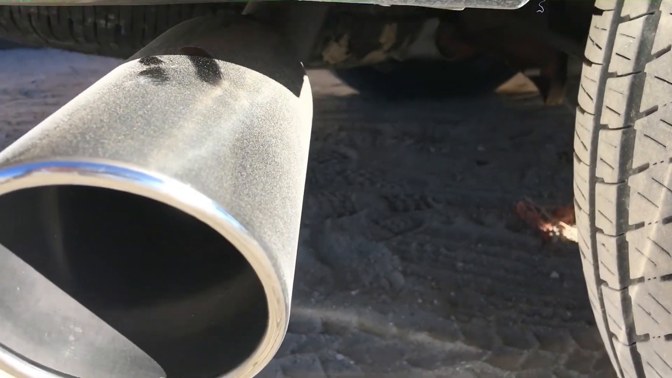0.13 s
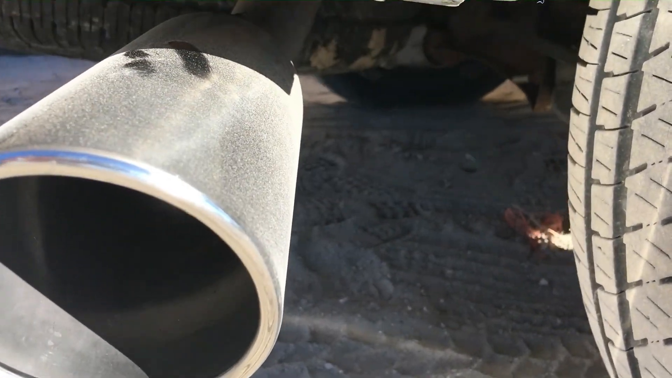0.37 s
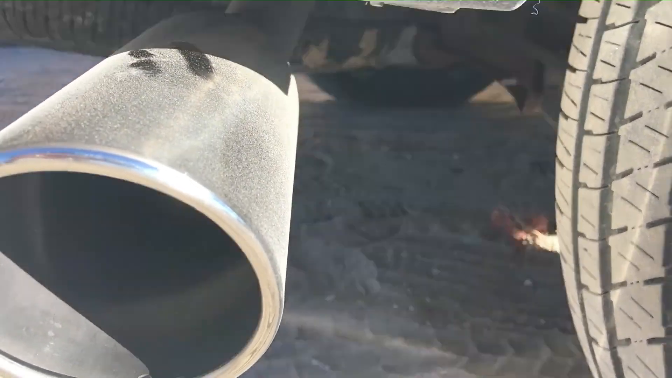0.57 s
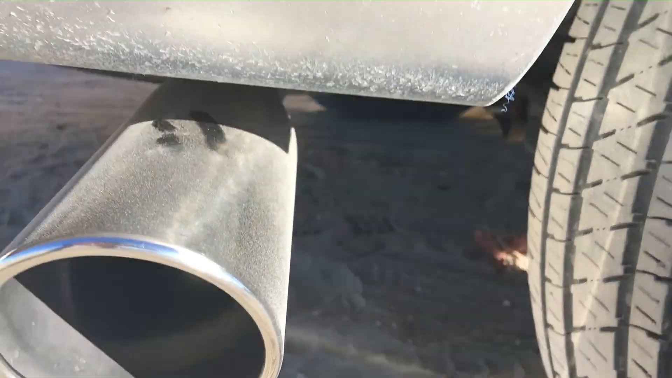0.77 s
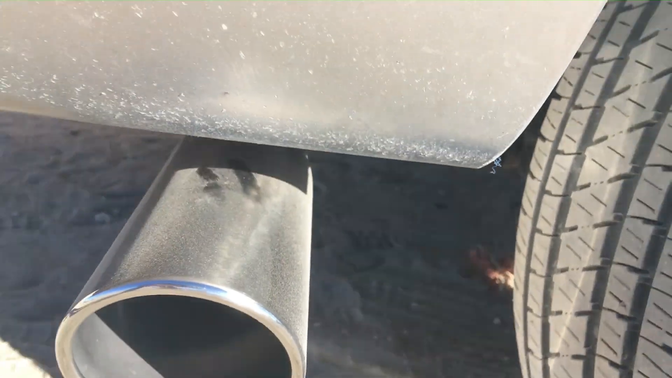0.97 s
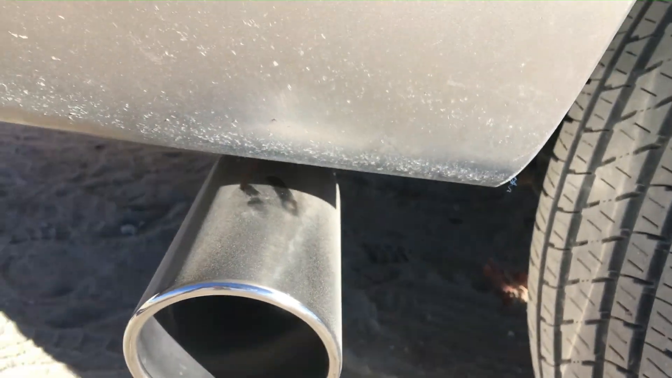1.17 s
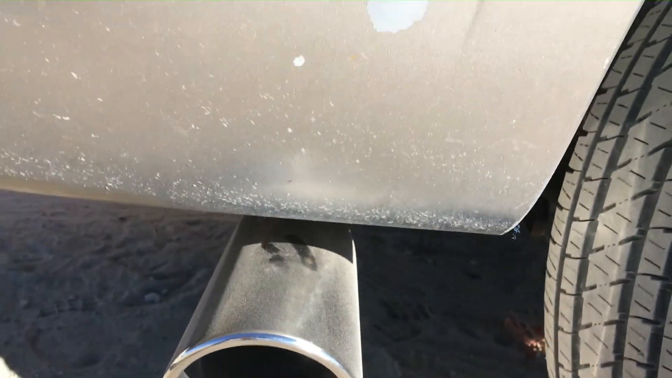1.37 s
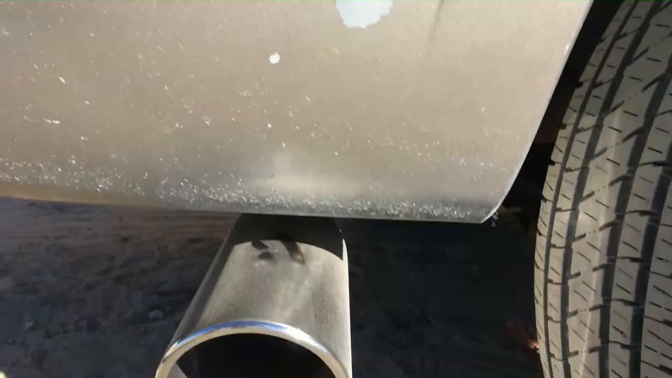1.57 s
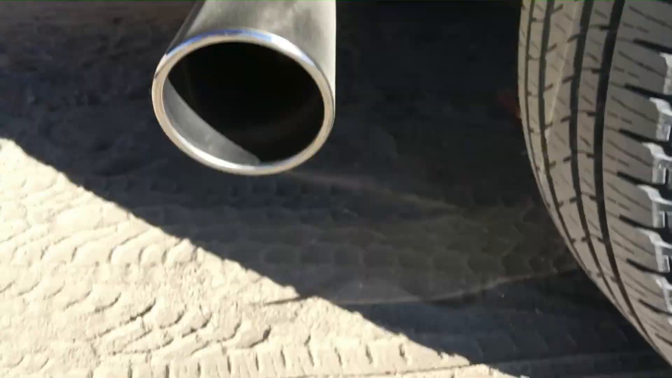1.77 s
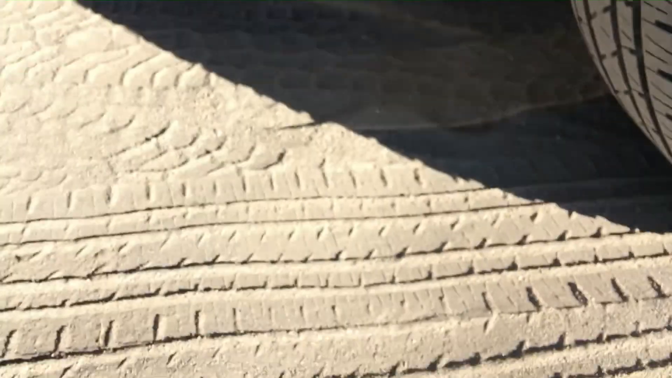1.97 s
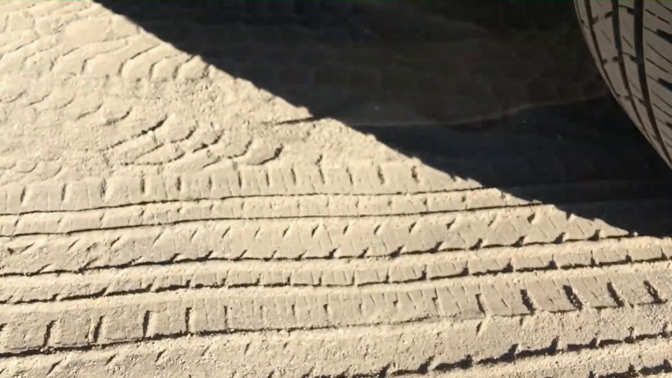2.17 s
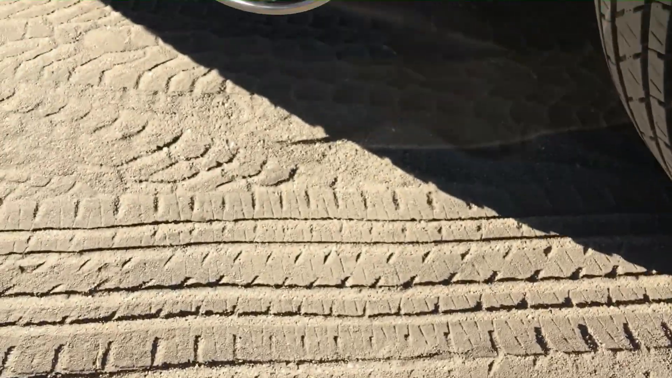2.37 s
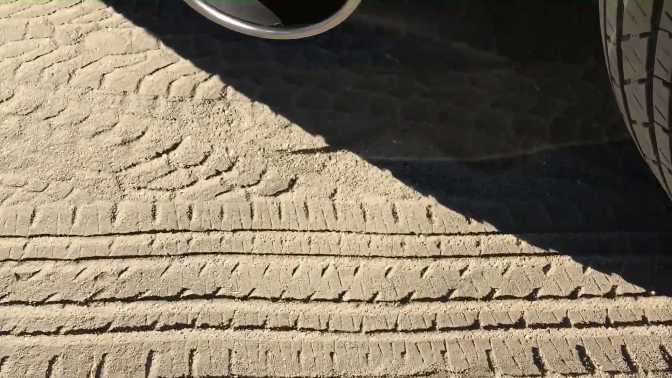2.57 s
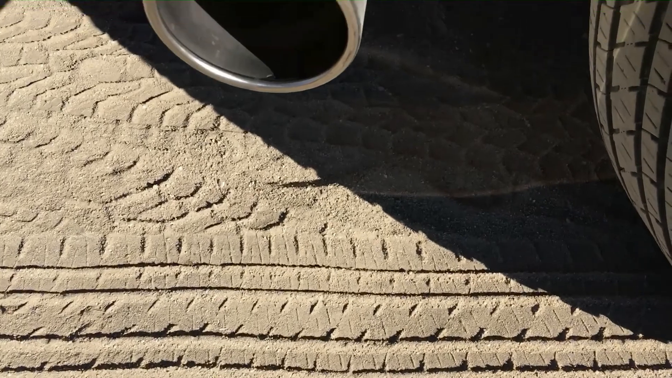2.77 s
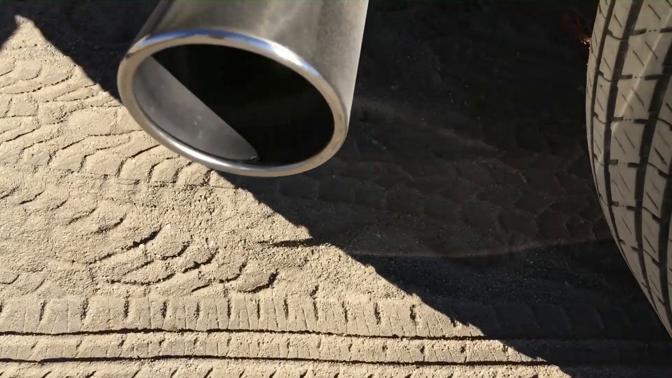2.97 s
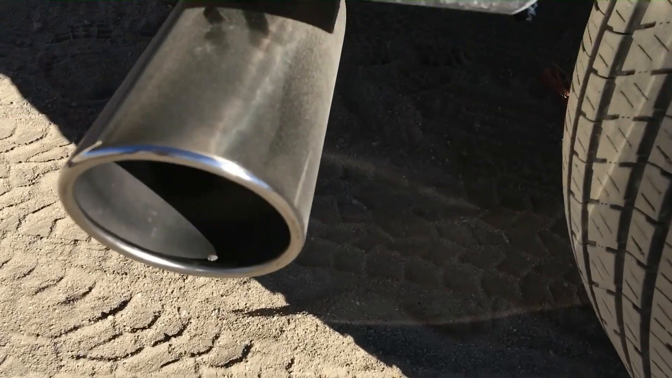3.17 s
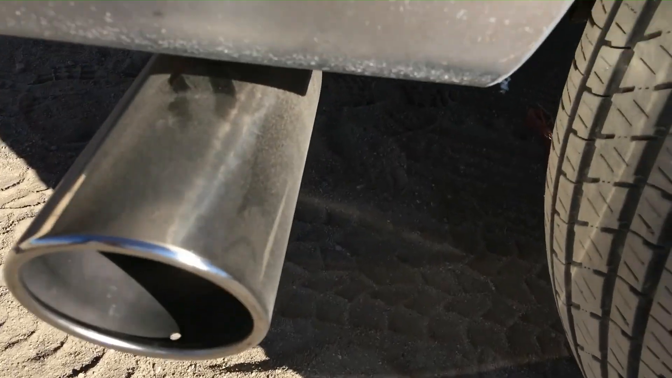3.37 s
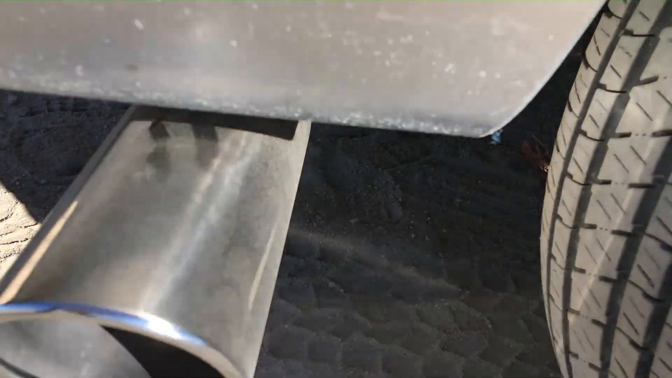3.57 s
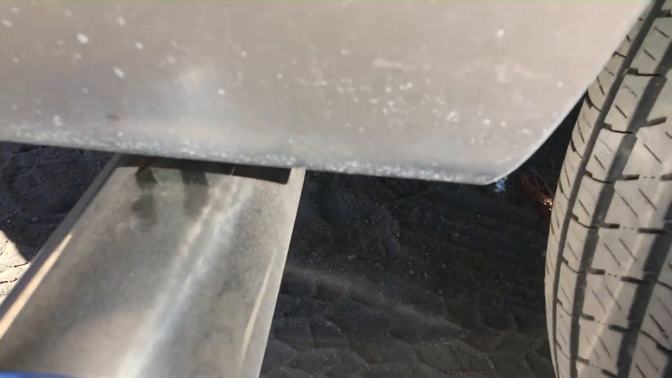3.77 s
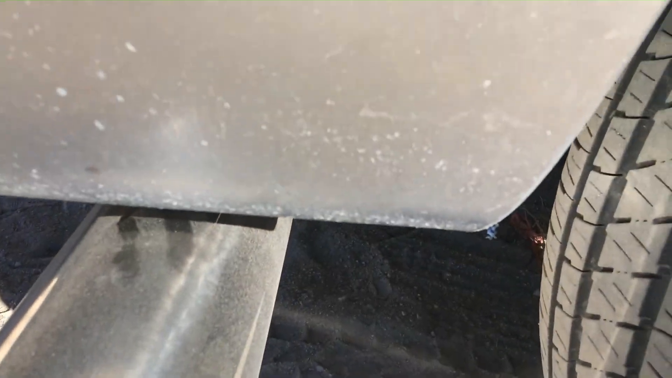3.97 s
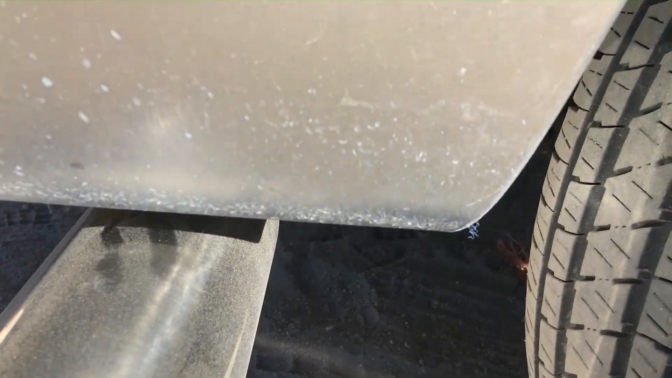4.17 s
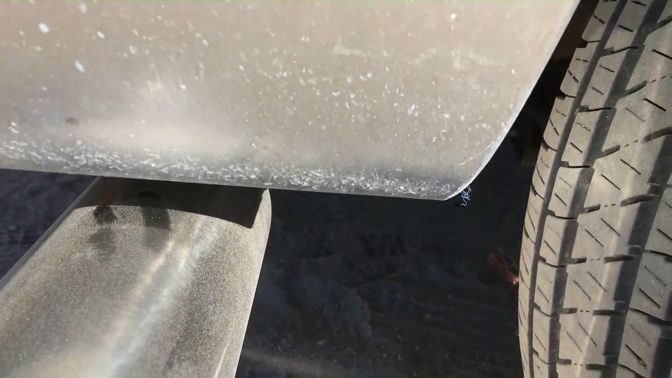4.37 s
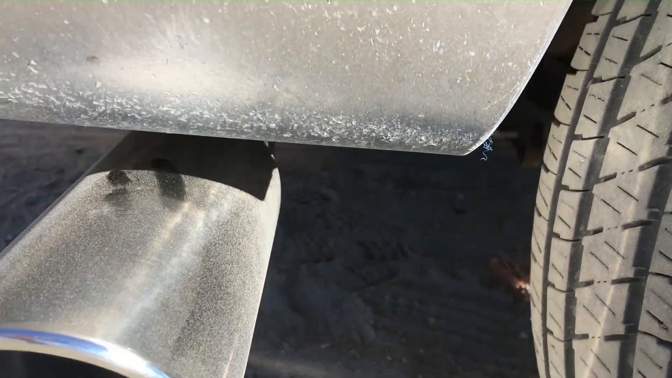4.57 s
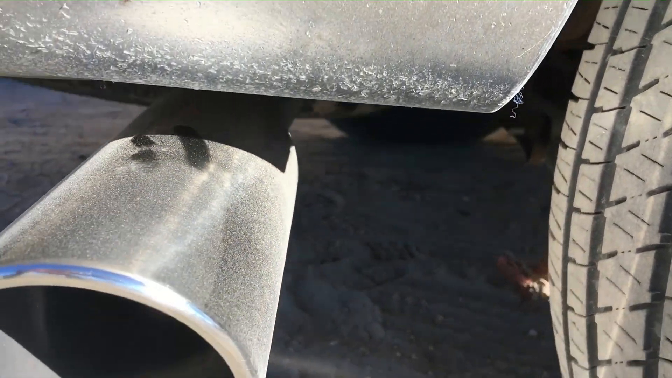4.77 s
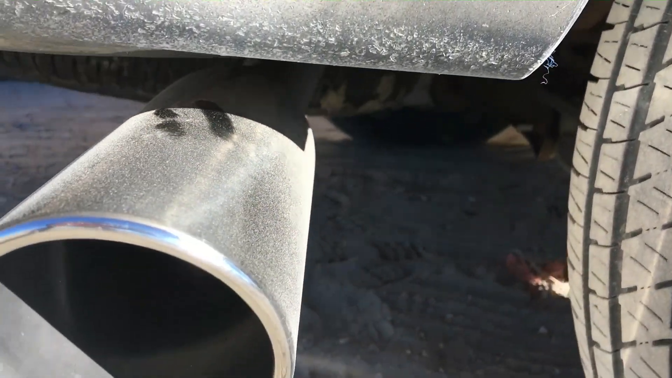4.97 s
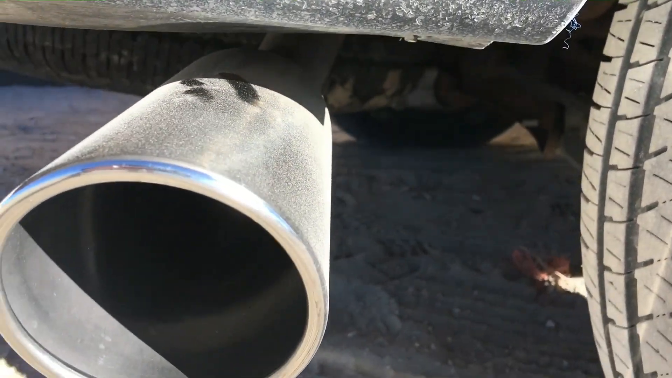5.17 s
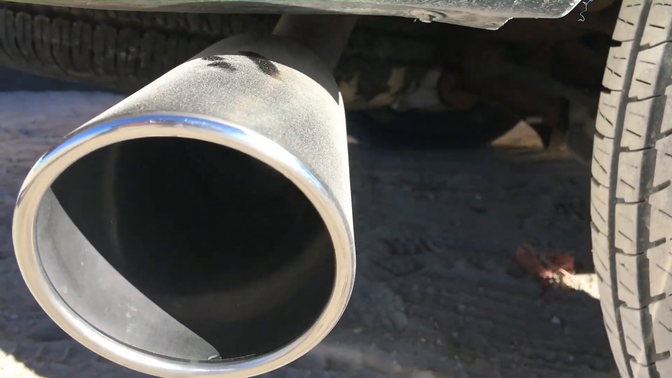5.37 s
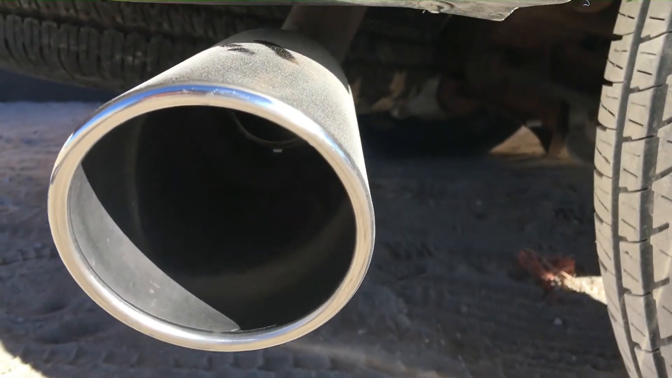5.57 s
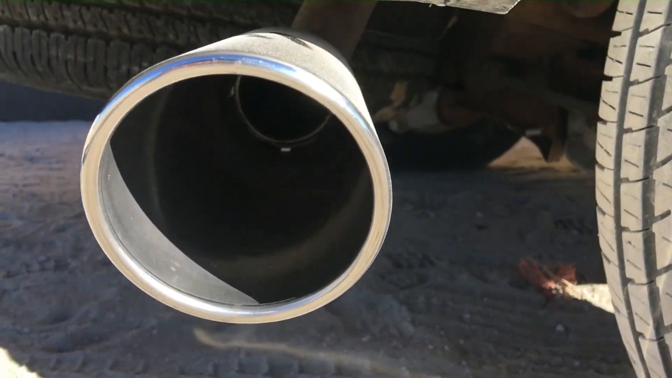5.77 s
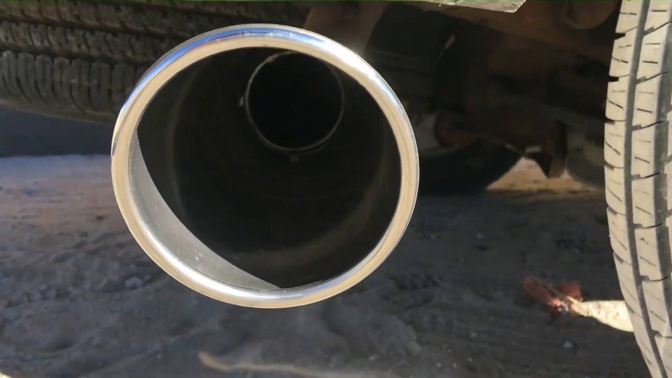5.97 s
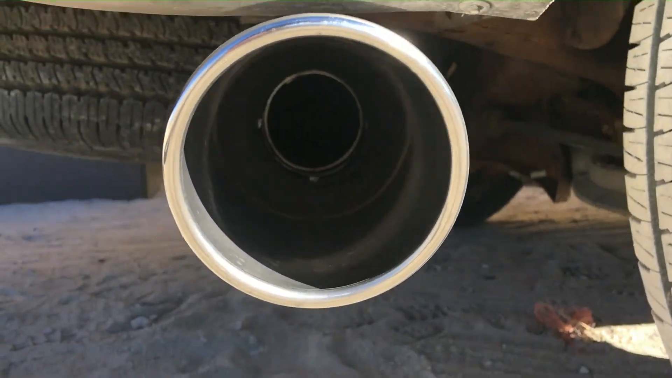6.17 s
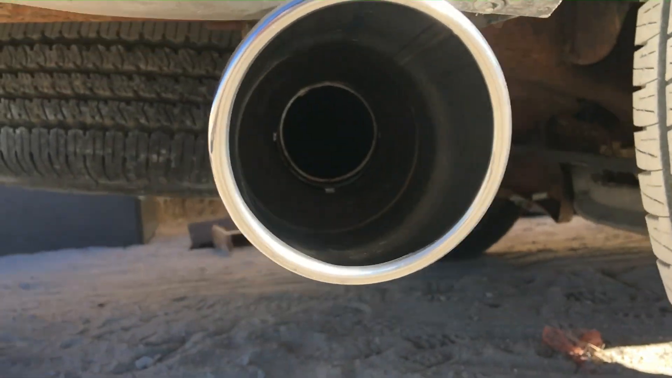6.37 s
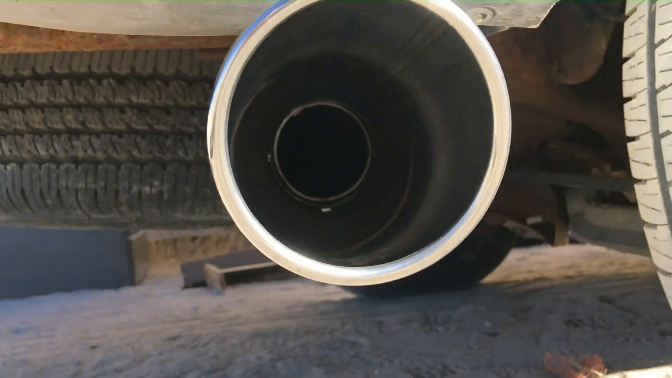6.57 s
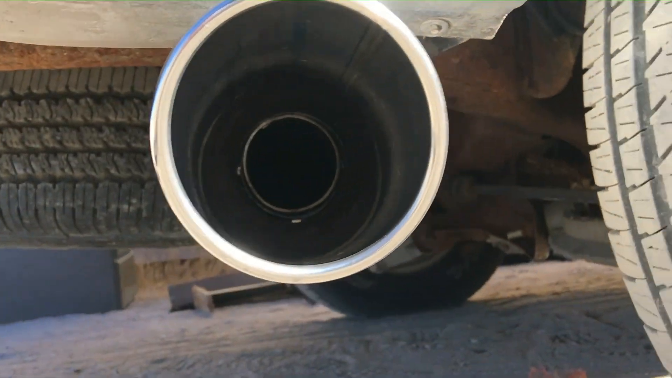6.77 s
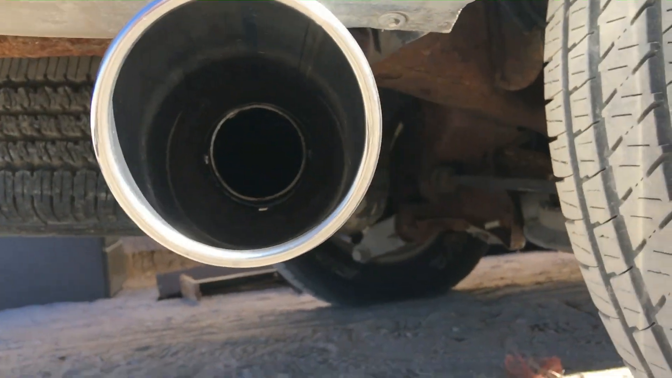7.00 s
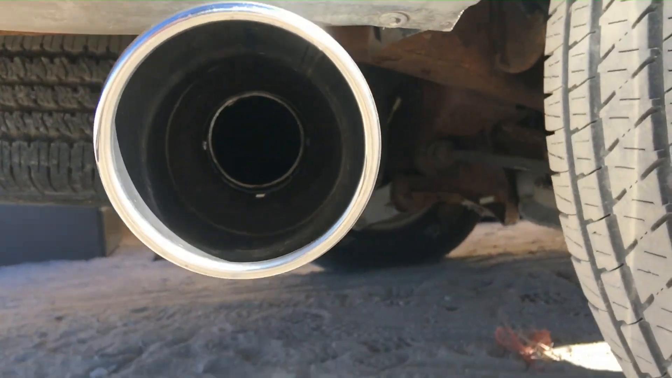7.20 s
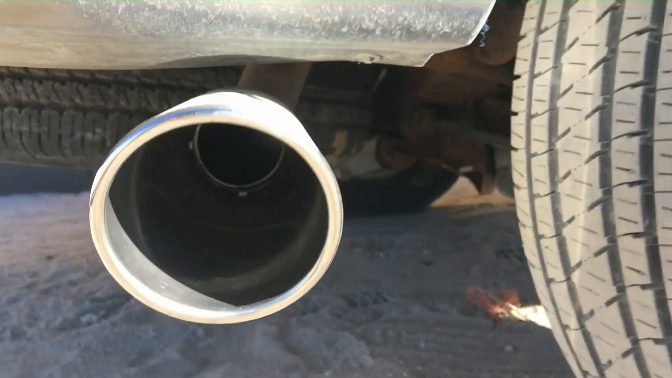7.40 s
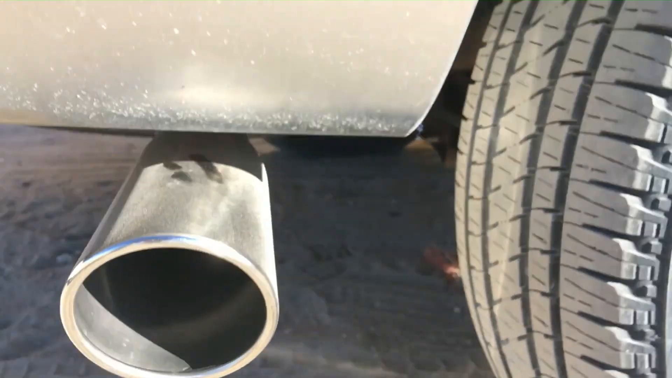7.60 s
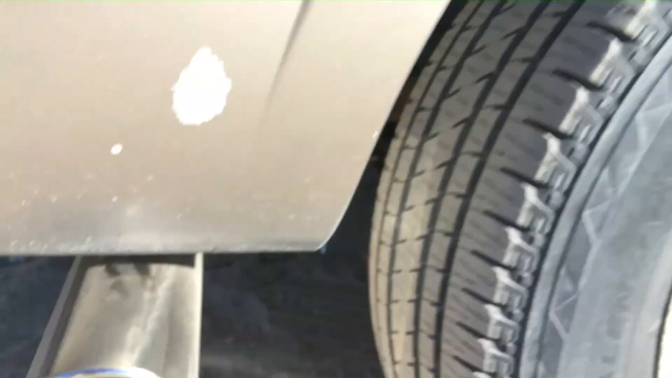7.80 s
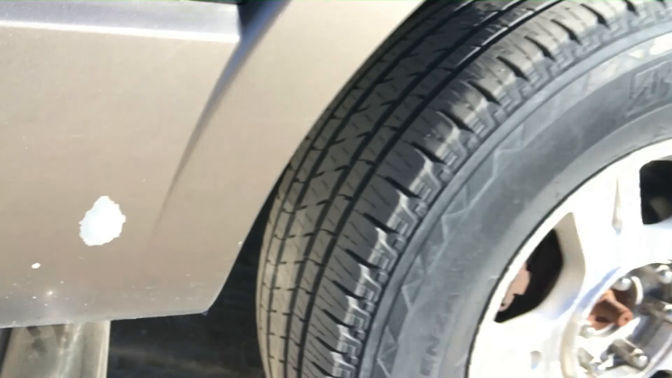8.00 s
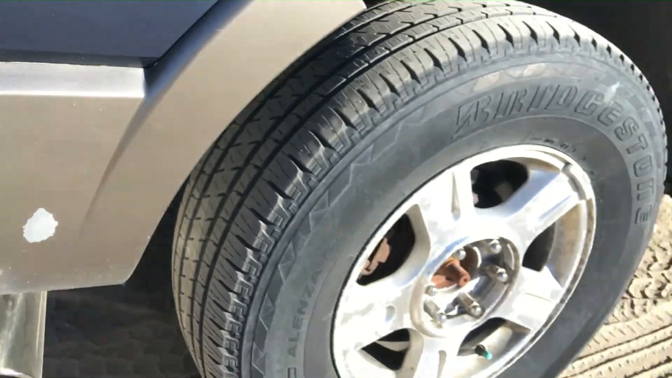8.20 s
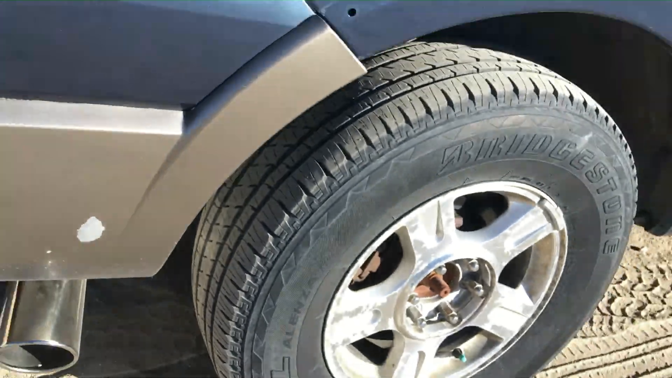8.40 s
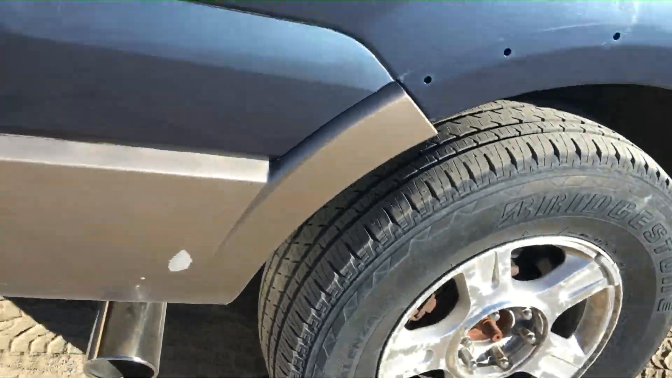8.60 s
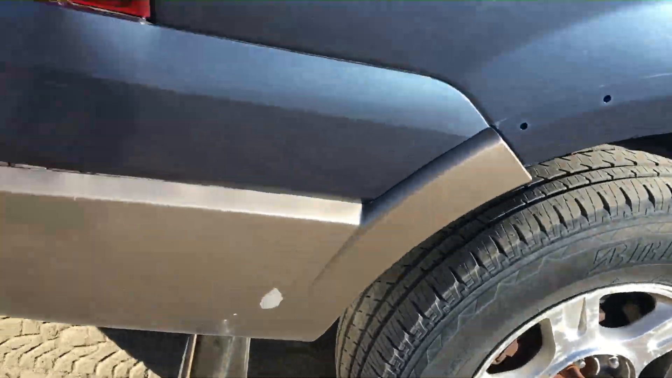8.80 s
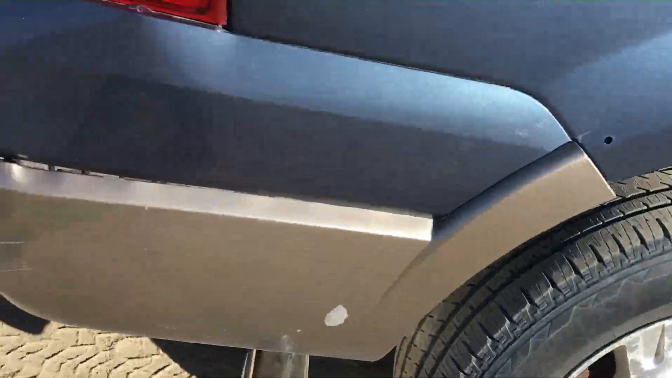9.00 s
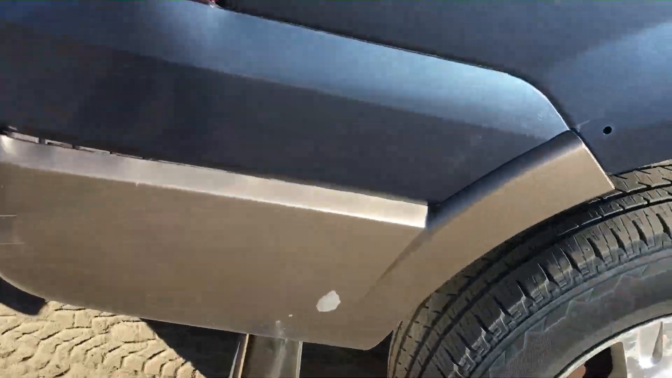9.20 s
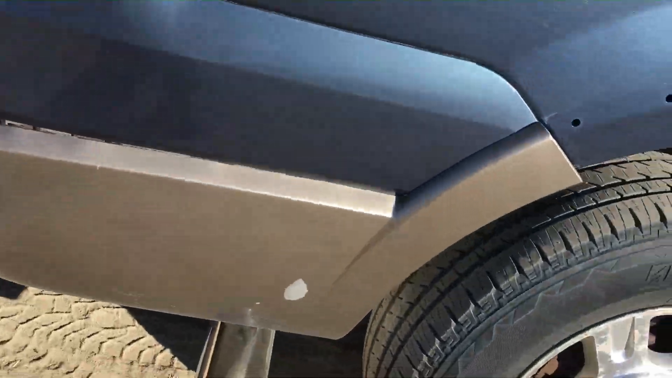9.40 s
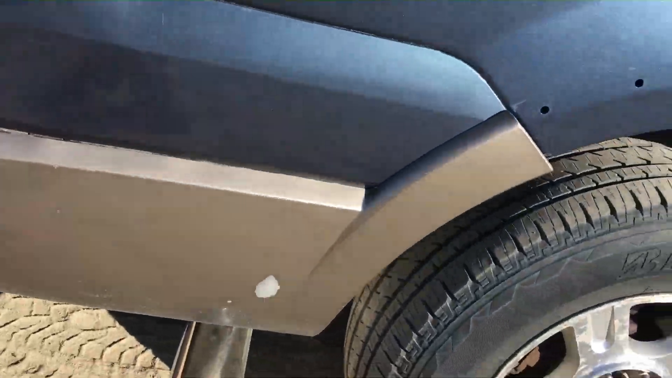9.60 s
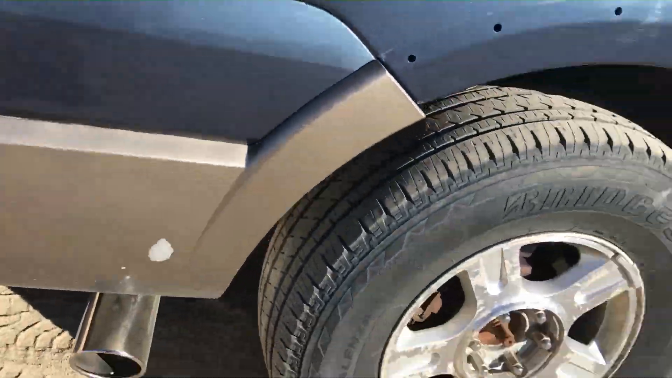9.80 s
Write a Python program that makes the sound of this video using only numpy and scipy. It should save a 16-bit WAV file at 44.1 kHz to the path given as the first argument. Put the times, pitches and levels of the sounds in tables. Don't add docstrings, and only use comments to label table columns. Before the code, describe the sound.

A big eight-cylinder engine idles with a deep, lumpy exhaust rumble close to the tailpipe, then quieter as the microphone steps back beside the truck.

```python
import sys
import numpy as np
from scipy import signal
from scipy.fft import rfft, irfft, next_fast_len
from scipy.io import wavfile
from scipy.ndimage import uniform_filter1d

SR = 44100
rng = np.random.default_rng(int(sys.argv[2]) if len(sys.argv) > 2 else 0)


def store_pcm(level_fs):
    pcm = np.round(np.clip(level_fs, -1, 1) * 32767).astype(np.int16)
    wavfile.write(sys.argv[1], SR, np.atleast_2d(pcm).T)


def undo_db(level):
    steps = np.asarray(level, float) / 20
    return 10 ** steps


N = 434385
TIME_S = np.arange(N) / SR

# time_s, speed_rpm
CRANK_SPEED = [(0.0, 694.8), (0.74, 702.5), (1.38, 717.3), (1.75, 684.2), (2.71, 689.8), (2.72, 686.9),
               (3.48, 689.3), (3.64, 706.4), (4.35, 724.6), (5.34, 704.3), (5.39, 695.3), (5.89, 692.8),
               (6.9, 700.9), (8.03, 713.5), (8.15, 706.8), (8.7, 714.1), (9.22, 700.6), (9.85, 693.0)]


def crank_rpm():
    return column(CRANK_SPEED, 1)


def crank_cycle():
    return np.cumsum(crank_rpm()) / SR / 120


# time_s, rumble_db
TAILPIPE_LEVEL = [(0.0, -10), (0.7, -13), (1.0, -14), (2.0, -16.5), (2.7, -15), (3.1, -14.5), (3.4, -14.5),
                  (3.75, -12.5), (4.1, -13.5), (5.1, -12), (5.75, -13), (6.8, -12.5), (7.45, -13.5),
                  (7.8, -16), (8.15, -19), (8.5, -20.5), (9.5, -21), (9.85, -20.5)]


def away():
    close_db, away_db = -13, -20
    return np.clip((close_db - column(TAILPIPE_LEVEL, 1)) / (close_db - away_db), 0, 1)


def exhaust(cycle):
    mix = undo_db(-0.6) * rumble(cycle) + gas_flow() + low_rasp(cycle) + upper_rasp(cycle)
    return undo_db(column(TAILPIPE_LEVEL, 1)) * mix


# cycle_place (0-1), bank (0 or 1), blow_db
FIRING = [
    (0.0121, 1, 6.7),
    (0.1351, 0, 9.5),
    (0.2818, 1, -2.4),
    (0.3836, 1, 2.4),
    (0.5089, 0, 6.0),
    (0.6402, 1, 5.4),
    (0.7733, 0, -10.5),
    (0.8834, 0, 7.1),
]
# pitch_hz, width_hz, gain (signed by its first swing)
PIPE_BANK_0 = [(54.9, 23.54, -1.69), (73.16, 12.0, -1.25), (72.0, 54.0, 1.62), (128.07, 39.56, 9.9),
               (128.0, 41.21, -9.77), (214.29, 12.0, -0.17), (247.08, 18.69, -0.06)]
# pitch_hz, width_hz, gain (signed by its first swing)
PIPE_BANK_1 = [(47.95, 28.8, 0.73), (74.35, 12.0, -0.66), (93.67, 18.98, -1.36), (117.85, 12.0, -1.02),
               (128.0, 33.73, 0.65), (200.11, 12.0, 0.18), (300.6, 12.0, 0.05)]


def rumble(cycle):
    size = next_fast_len(N + 2 * SR)
    hz = np.fft.rfftfreq(size, 1 / SR)
    first_cycle = np.searchsorted(cycle, 1)
    spectrum = 0
    for bank, pipe in enumerate([PIPE_BANK_0, PIPE_BANK_1]):
        places, blow_db = np.transpose([(place, db) for place, side, db in FIRING if side == bank])
        ring = sum(gain * width * f / (f ** 2 - hz ** 2 + 1j * hz * width) for f, width, gain in pipe)
        blows = beats(cycle, places, blow_db, spread_db=.8, jitter_s=.0002)
        blows = np.pad(blows, (0, size - N))
        blows[-first_cycle:] = blows[:first_cycle]
        spectrum = spectrum + ring * rfft(blows)
    bass_cut = hz ** 2 / (45 ** 2 - hz ** 2 + 64j * hz)
    bass_cut = bass_cut / (1 + (37 / (hz + 1)) ** 10)
    return evened(irfft(spectrum * bass_cut, size)[:N])


# cycle_place (0-1), low_db, middle_db, high_db
SLUGS = [(.035, -4, -6, -14), (.06, -9, -12, -3), (.2, -8, -12, -16), (.29, -2, -3, -16),
         (.385, -3, -4, -5), (.41, -12, -14, -4), (.54, -5, -8, -16), (.645, -6, -8, -8),
         (.7, -12, -14, -8), (.765, -3, 0, 0), (.825, -3, -4, -10), (.945, -7, -8, -5)]


def rasp(cycle, slug_db, modes, centre_hz, span_hz, lead_cycles, jitter_s):
    places = np.transpose(SLUGS)[0] - lead_cycles
    slaps = beats(cycle, places, slug_db, spread_db=2, jitter_s=jitter_s)
    decay = np.exp(-np.arange(800) / SR / .004)
    tumble = signal.oaconvolve(slaps, decay)[:N] + .04
    ring = body(slaps + .045 * rng.standard_normal(N) * tumble, modes)
    return evened(resonate_twice(ring, centre_hz, span_hz))


# pitch_hz, width_hz, level_db
LOW_RASP_MODES = [(210, 8.9, 7.5), (256, 86, -6), (289.2, 41, -1), (356, 40, -2)]


def low_rasp(cycle):
    low_db = np.transpose(SLUGS)[1]
    level_db = -16 - 9.5 * away()
    return undo_db(level_db) * rasp(cycle, low_db, LOW_RASP_MODES, 245.0, 170, 0, jitter_s=.0005)


# pitch_hz, width_hz, level_db
MIDDLE_RASP_MODES = [(386, 26, 0), (431, 30, 0), (485, 40, -7)]
# pitch_hz, width_hz, level_db
HIGH_RASP_MODES = [(510, 40, -8), (562, 22, 0), (650, 80, -14)]


def upper_rasp(cycle):
    middle_db, high_db = np.transpose(SLUGS)[2:]
    lead_cycles, jitter_s = .025, .0009
    middle = glide(rasp(cycle, middle_db, MIDDLE_RASP_MODES, 441, 380, lead_cycles, jitter_s))
    high = rasp(cycle, high_db, HIGH_RASP_MODES, 561, 420, lead_cycles, jitter_s)
    return undo_db(-22) * (middle + undo_db(-5.5) * high)


def glide(x):
    sweep_s_per_hz, sweep_hz = .00005, 420
    size = next_fast_len(N)
    offset_hz = np.clip(np.fft.rfftfreq(size, 1 / SR), 0, 2 * sweep_hz) - sweep_hz
    return irfft(rfft(x, size) * np.exp(-1j * np.pi * sweep_s_per_hz * offset_hz ** 2), size)[:N]


# pitch_hz, level_db
FLOW_SPECTRUM = [(30, -55), (38, -26), (48, -6), (70, 0), (130, -2), (200, -8), (260, -20), (500, -30),
                 (700, -40), (1100, -48)]


def gas_flow():
    return undo_db(-17.5) * coloured(FLOW_SPECTRUM, patchy_db=1.5)


# pitch_hz, level_db
ROAR_SPECTRUM = [(500, -11.5), (650, 2), (800, 0), (1150, -2.5), (1350, -5), (2000, -10.5), (2900, -15),
                 (3300, -20.5), (4400, -24), (4800, -38), (6000, -54.5)]


def roar(cycle):
    throb_db = 1.5 * np.cos(2 * np.pi * (3 * cycle - .15))
    return undo_db(-48.7 + throb_db) * coloured(ROAR_SPECTRUM, patchy_db=1.5)


# pitch_hz, width_hz, level_db
CHUFF_MODES = [(1494, 55, 0.5), (1650, 100, -0.5), (1920, 52, 1.5), (2310, 190, -13.5), (2570, 140, -11),
               (3000, 150, -14.5)]
# cycle_place (0-1), level_db
CHUFF_SHAPE = [(0.0, -17), (.5, -19), (.525, -2), (.56, -3), (.595, 2), (.62, -3), (.675, 0), (.75, -3),
               (.85, -10), (1.0, -17)]


def chuff(cycle):
    lead_cycles = .012
    air = rng.standard_normal(N) * amp_of(CHUFF_SHAPE, (cycle + lead_cycles) % 1)
    return undo_db(-53 - 3.5 * away()) * evened(body(air, CHUFF_MODES))


def knock(cycle):
    taps = beats(cycle, [.52, .595], np.array([0, -5]), spread_db=1, jitter_s=.0007)
    bright = resonate(rattle(taps, .008, 3030, 300), 3030, 400)
    dull = resonate(rattle(taps, .007, 1600, 300), 1600, 400)
    clearing_db = np.interp(TIME_S, (7.6, 8.2), [0, 14.5])
    return undo_db(-61.5 + clearing_db) * (bright + 2.6 * dull)


# cycle_place (0-1), level_db
VALVES = [
    (.03, -63),
    (.655, -65),
]


def valve_ticks(cycle):
    places, level_db = np.transpose(VALVES)
    clicks = beats(cycle, places, level_db, spread_db=2.5, jitter_s=.0005)
    return rattle(clicks, .003, 8000, 7000)


# middle_s, length_s, rise_db
PUMP_SWELLS = [(.4, 2.7, 8.5), (1.5, 0.33, 5), (2.1, .6, 4), (3.3, 1, 3), (3.85, 1.5, 10.5), (4.9, 1.8, 7),
               (6.0, 1, 1.5), (7.2, 0.62, 10.5), (8.0, 1.06, 12), (8.6, 1.0, 8.5), (9.55, 0.74, 5.5)]


def pump_whine():
    pump_hz = 1221 + .95 * (crank_rpm() - 700)
    fuzz = resonate(rng.standard_normal(N), pump_hz, 36)
    fuzz = evened(resonate(fuzz, pump_hz, 25))
    tone = np.sin(2 * np.pi * np.cumsum(pump_hz) / SR)
    return undo_db(-59.5 + swells(PUMP_SWELLS)) * (.8 * fuzz + .9 * tone)


# middle_s, length_s, rise_db
ALTERNATOR_SWELLS = [
    (.2, 1.0, 6.5),
    (1.5, 0.58, 4),
    (2.35, .4, 6.5),
    (3.1, 1.1, 9),
    (4.4, 1.5, 10.5),
    (5.8, 2.3, 7.5),
    (7.0, 1.5, 4),
    (7.83, 0.28, 12),
]


def alternator_tone():
    load_on_s, load_off_s, sag_hz = 1.5, 3.55, 25
    loaded = (TIME_S > load_on_s) & (TIME_S < load_off_s)
    tone_hz = 5730 - sag_hz * loaded
    waver_db = 2.2 * evened(uniform_filter1d(rng.standard_normal(N), size=3000))
    level = undo_db(-80 + swells(ALTERNATOR_SWELLS) + waver_db)
    return level * np.sin(2 * np.pi * np.cumsum(tone_hz) / SR)


# pitch_hz, width_hz, level_db
HUMS = [(997, 18, -60), (1927, 14, -64), (2229, 14, -70), (2627, 18, -71), (4300, 60, -79), (11461, 6, -92)]


def hums():
    total = np.zeros(N)
    for pitch_hz, width_hz, level_db in HUMS:
        total += undo_db(level_db) * evened(resonate(rng.standard_normal(N), pitch_hz, width_hz))
    return undo_db(2.5 - 6.5 * away()) * total


# time_s, peak_db, centre_hz
CLICKS = [(.129, -46, 7000), (1.467, -50, 11000), (1.493, -41, 10000), (1.526, -46, 8000),
          (1.556, -50, 5500), (1.562, -44, 11000), (1.574, -51, 10000), (1.647, -41, 9000),
          (3.106, -53, 7000), (3.614, -49, 7000), (3.797, -53, 7000), (4.629, -53, 7000),
          (5.562, -50, 8000), (5.978, -51, 7000), (6.341, -49, 7000), (6.61, -39, 13000),
          (6.685, -52, 8000), (6.86, -51, 8000), (7.932, -52, 11000), (8.057, -42, 6500),
          (8.086, -41, 7000), (8.092, -44, 7000), (8.33, -50, 9000), (8.392, -43, 10000),
          (8.444, -45, 10000), (8.487, -47, 10000), (8.495, -48, 11000), (8.975, -50, 9000),
          (8.99, -47, 9000), (9.0, -49, 10000)]


def fingers():
    length = 600
    out = np.zeros(N + length)
    decay = np.exp(-np.arange(length) / SR / .0034)
    for time_s, peak_db, centre_hz in CLICKS:
        band_hz = [.6 * centre_hz, 1.5 * centre_hz]
        band = signal.butter(2, band_hz, "band", fs=SR, output="sos")
        scratch = evened(signal.sosfilt(band, rng.standard_normal(length)))
        out[round(time_s * SR):][:length] += undo_db(peak_db - 6) * scratch * decay
    return out[:N]


# pitch_hz, level_db
HISS_SPECTRUM = [(3000, -12.5), (4800, -3.5), (6200, -0.5), (7000, -3.7), (8000, -6.5), (9500, -3.5),
                 (10500, -10), (11200, -6.5), (15500, -8), (16000, -35.5)]
# middle_s, length_s, rise_db
RUSTLES = [
    (8.1, 0.33, 2.5),
    (8.45, 1.8, 9.5),
    (9.0, 0.17, 3.5),
    (9.35, 1.5, 5),
    (9.6, 0.29, 5.5),
    (9.85, .6, 12.5),
]


def hiss():
    flicker_db = 1.3 * evened(uniform_filter1d(rng.standard_normal(N), size=900))
    level_db = -67 - 5.5 * away() + swells(RUSTLES) + flicker_db
    return undo_db(level_db) * coloured(HISS_SPECTRUM, patchy_db=-0.5)


def fan():
    air = resonate_twice(rng.standard_normal(N), 2820, 350)
    return undo_db(-65) * away() ** 2 * evened(air)


def beats(cycle, places, level_db, spread_db, jitter_s):
    wanted = np.arange(int(cycle[-1]) + 1)[:, None] + np.asarray(places)
    chance = rng.standard_normal(wanted.shape + (2,))
    at = np.interp(wanted, cycle, np.arange(N)) + jitter_s * SR * chance[..., 0]
    at = np.clip(at.astype(int), 0, N - 1)
    strength = undo_db(level_db + spread_db * chance[..., 1]) * (wanted < cycle[-1])
    train = np.zeros(N)
    np.add.at(train, at, strength)
    return train


def rattle(train, decay_s, centre_hz, width_hz):
    burst = signal.oaconvolve(train, np.exp(-np.arange(2000) / SR / decay_s))[:N]
    return burst * evened(resonate(rng.standard_normal(N), centre_hz, width_hz))


def resonate(x, pitch_hz, width_hz):
    turn = np.exp(2j * np.pi * np.cumsum(pitch_hz * np.ones(N)) / SR)
    r = np.exp(-np.pi * width_hz / SR)
    return 2 * (turn * signal.lfilter([1 - r], [1, -r], x / turn)).real


def resonate_twice(x, pitch_hz, width_hz):
    return resonate(resonate(x, pitch_hz, width_hz), pitch_hz, width_hz)


def body(x, modes):
    out = np.zeros(N)
    for k, (pitch_hz, width_hz, level_db) in enumerate(modes):
        out += (-1) ** k * undo_db(level_db) * resonate(x, pitch_hz, width_hz)
    return out


def coloured(spectrum, patchy_db):
    frames, bin_hz = N // 256 + 5, np.fft.rfftfreq(1024, 1 / SR)
    a, b, patches = rng.standard_normal((frames, 513, 3)).T
    patches = uniform_filter1d(patches, size=12, axis=0)
    patches = evened(uniform_filter1d(patches, size=10, axis=1))
    pitch_hz, level_db = np.transpose(spectrum)
    shape_db = np.interp(np.log(bin_hz + 1), np.log(pitch_hz), level_db, left=-90, right=-90)
    bins = (a + 1j * b) * undo_db(shape_db[:, None] + patchy_db * patches)
    return evened(signal.istft(bins, nperseg=1024, noverlap=768)[1][:N])


def swells(rows):
    total_db = np.zeros(N)
    for middle_s, length_s, rise_db in rows:
        total_db += rise_db * np.cos(np.pi * np.clip((TIME_S - middle_s) / length_s, -.5, .5)) ** 2
    return total_db


def amp_of(points, at):
    place, level_db = np.transpose(points)
    return undo_db(np.interp(at, place, level_db))


def column(rows, k):
    rows = np.array(rows)
    return np.interp(TIME_S, rows[:, 0], rows[:, k])


def evened(x):
    return x / np.sqrt(np.mean(x ** 2) + 1e-20)


def scene():
    cycle = crank_cycle()
    engine_bay = roar(cycle) + chuff(cycle) + knock(cycle) + valve_ticks(cycle)
    whines = pump_whine() + alternator_tone() + hums()
    mix = exhaust(cycle) + engine_bay + whines + fingers() + hiss() + fan()
    return mix[None]


def band_limit(x):
    return signal.sosfilt(signal.butter(12, 15830, fs=SR, output="sos"), x)


# time_s, depth_db
TREBLE_DROPOUTS = [(0.534, -33), (0.621, -20), (0.876, -27.5), (1.281, -17), (1.622, -12), (2.03, -9),
                   (2.392, -33), (2.539, -15), (3.268, -42.5), (3.393, -21), (3.543, -37), (4.161, -16.5),
                   (4.355, -12.5), (4.418, -6.5), (4.612, -37), (4.674, -16), (5.077, -21), (5.228, -31),
                   (5.246, -28), (6.699, -29), (7.064, -19), (7.66, -16), (7.746, -42.5), (8.366, -40),
                   (8.428, -14), (8.515, -17), (8.812, -15), (9.452, -17), (9.687, -18.5)]


def record(dry):
    high_pass = signal.butter(N=6, Wn=2700, btype="high", fs=SR, output="sos")
    treble = signal.sosfiltfilt(high_pass, dry)
    length = 1100
    dip_db = np.zeros(N + length)
    for time_s, depth_db in TREBLE_DROPOUTS:
        dip_db[round((time_s - .006) * SR):][:length] += depth_db * np.hanning(length)
    mix = dry + treble * (undo_db(dip_db[:N]) - 1)
    return band_limit(mix)


dry = scene()
out = record(dry)
store_pcm(out)
```